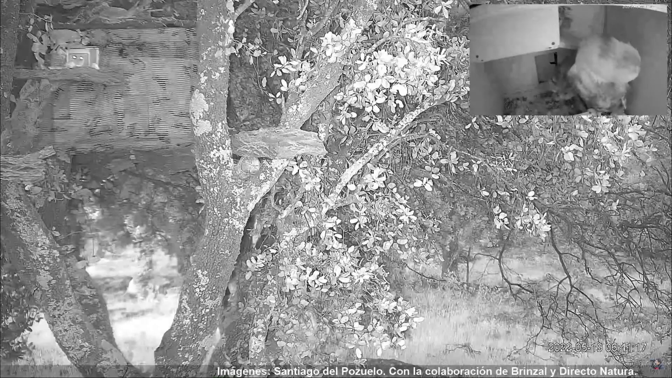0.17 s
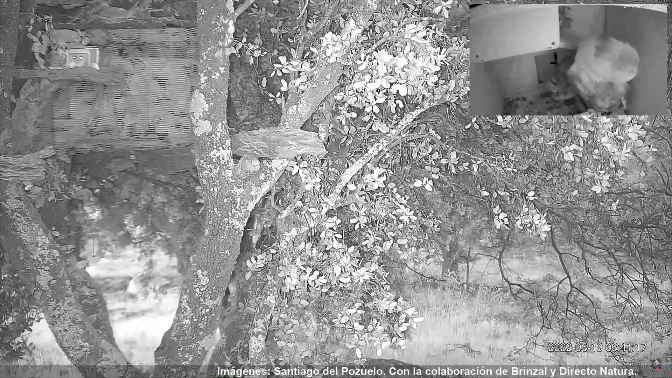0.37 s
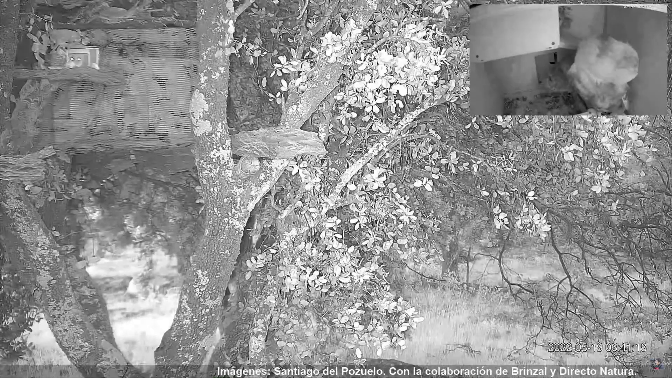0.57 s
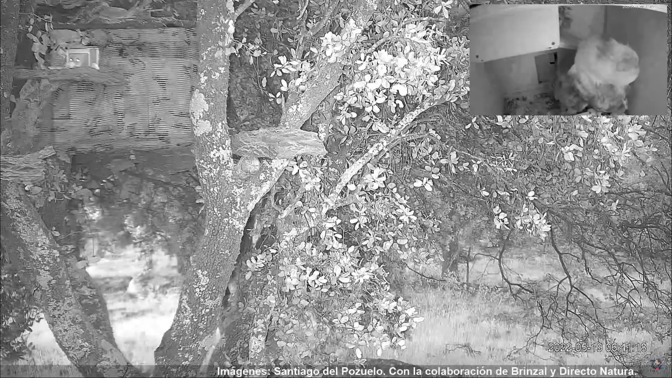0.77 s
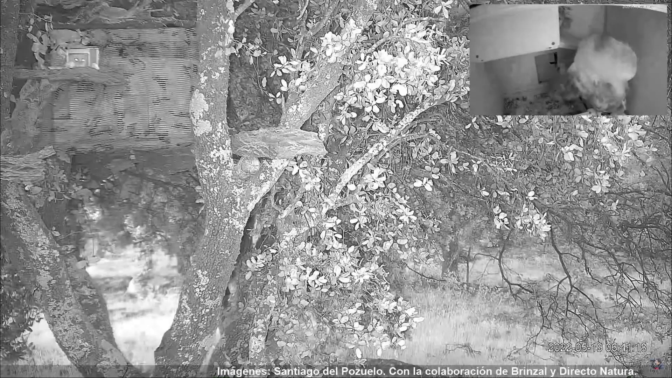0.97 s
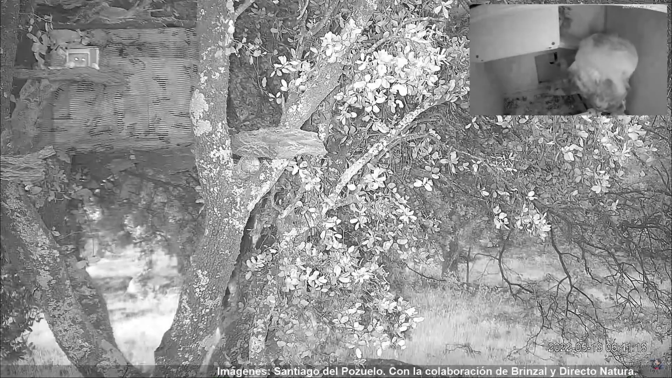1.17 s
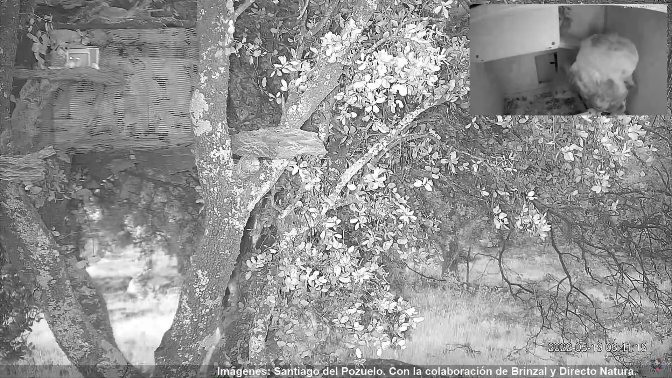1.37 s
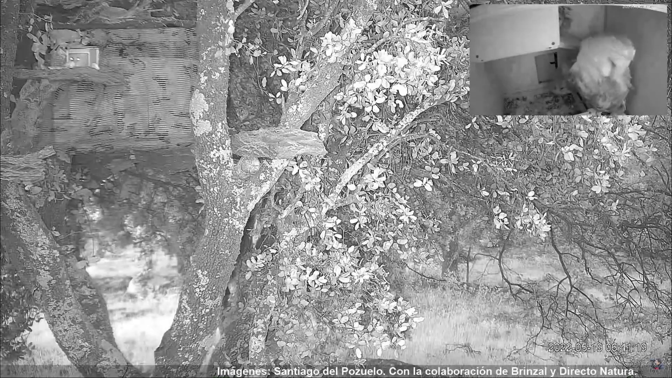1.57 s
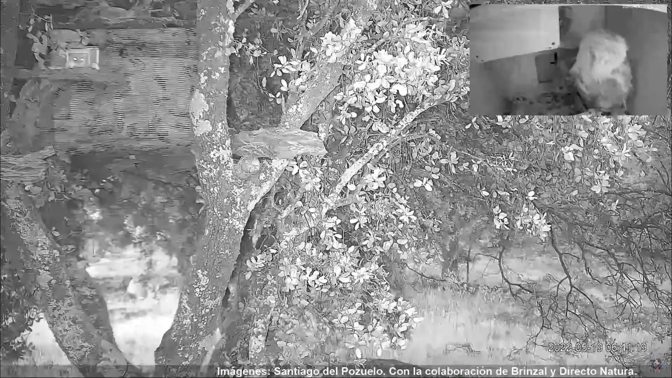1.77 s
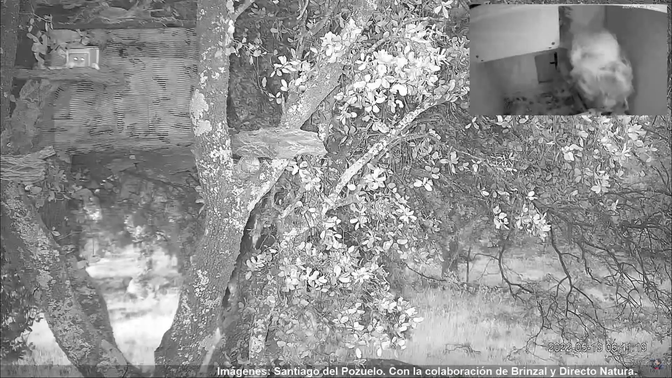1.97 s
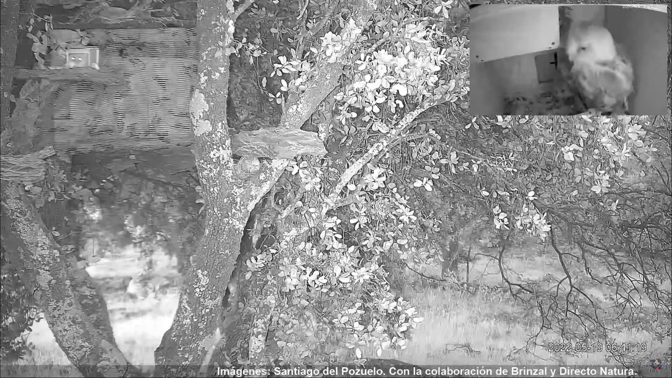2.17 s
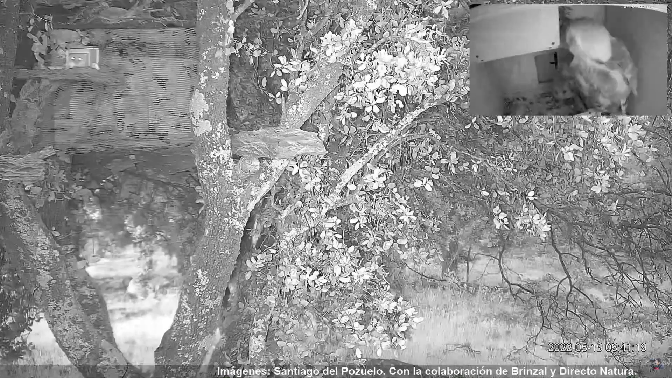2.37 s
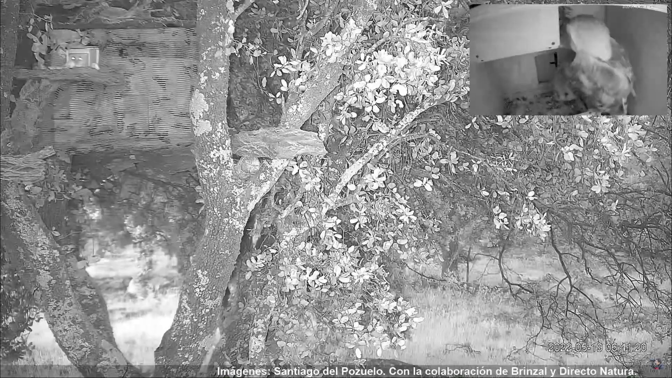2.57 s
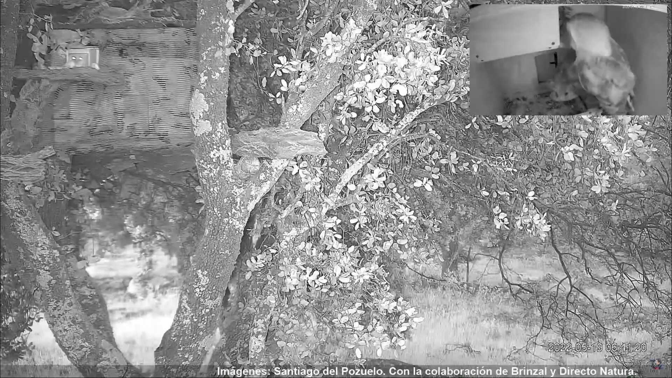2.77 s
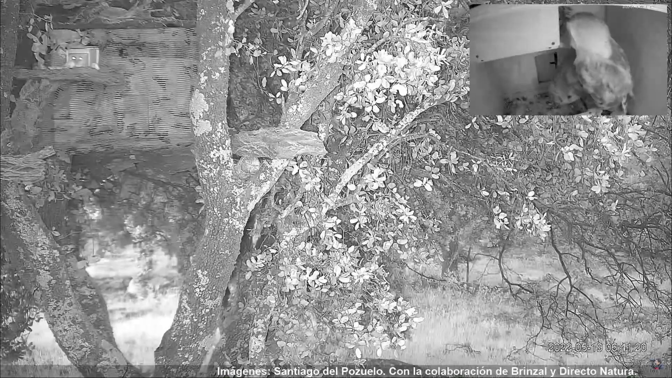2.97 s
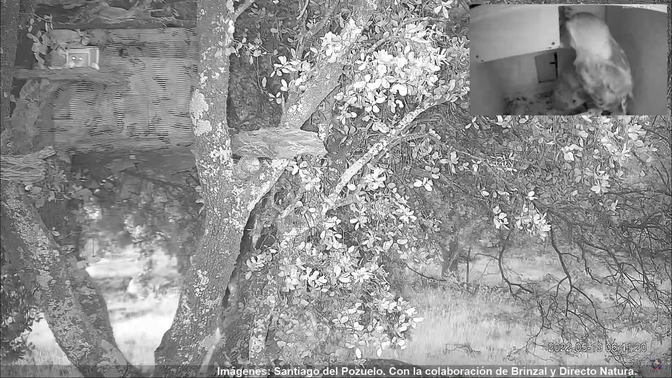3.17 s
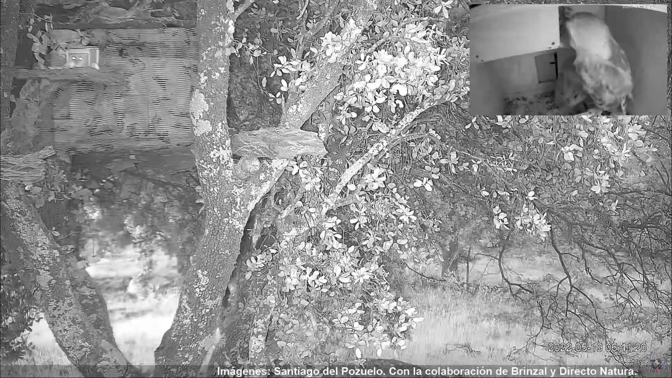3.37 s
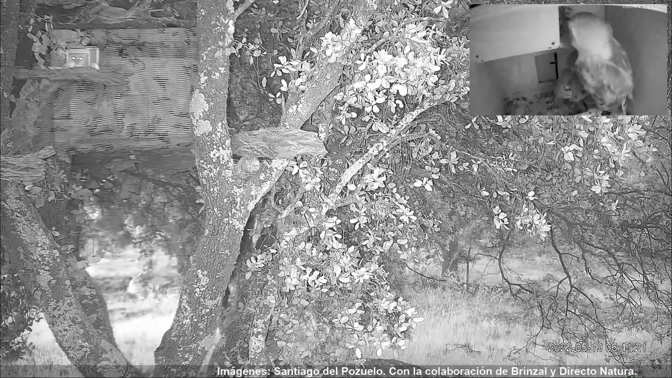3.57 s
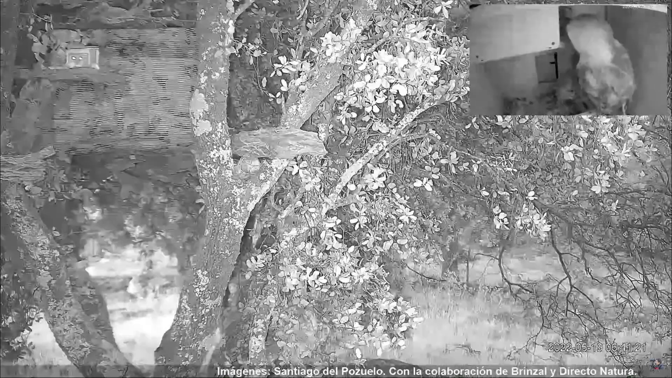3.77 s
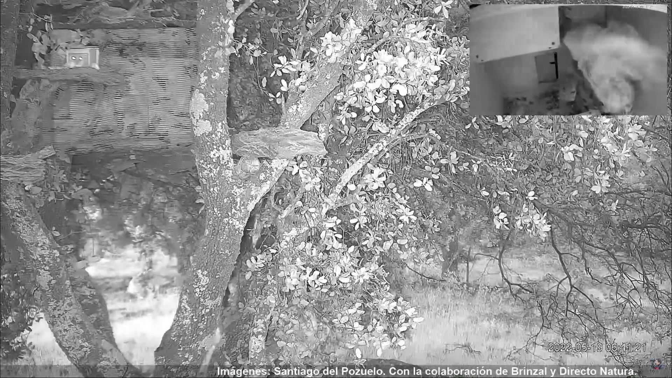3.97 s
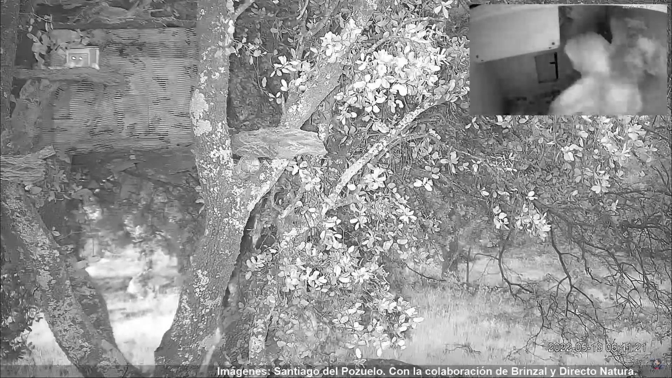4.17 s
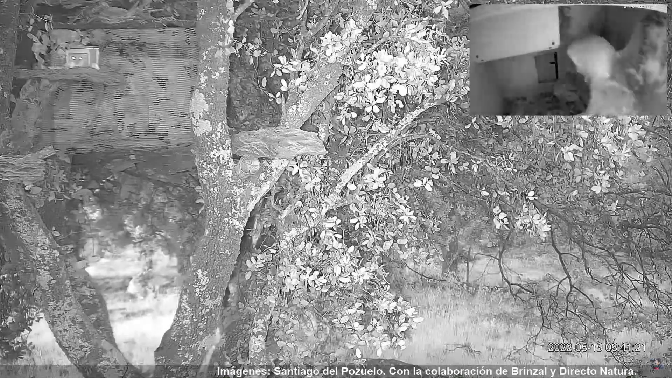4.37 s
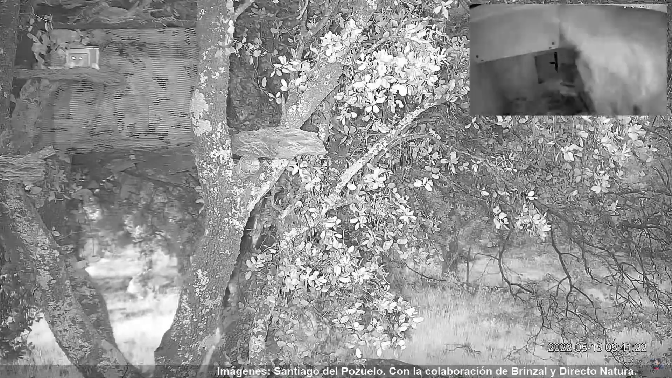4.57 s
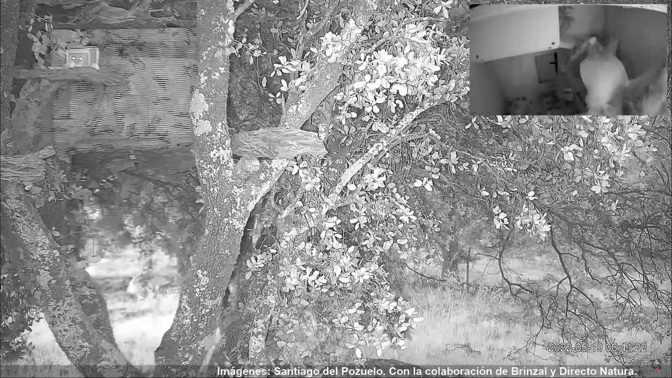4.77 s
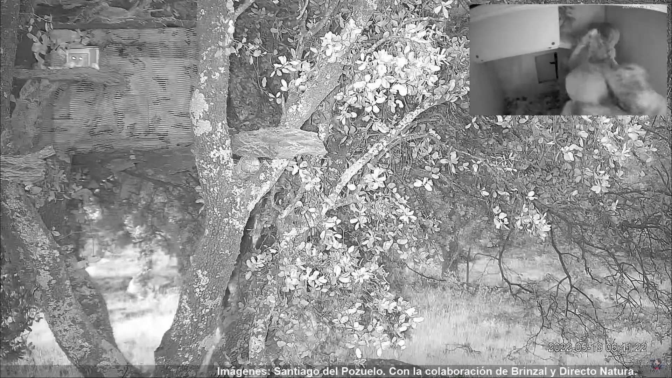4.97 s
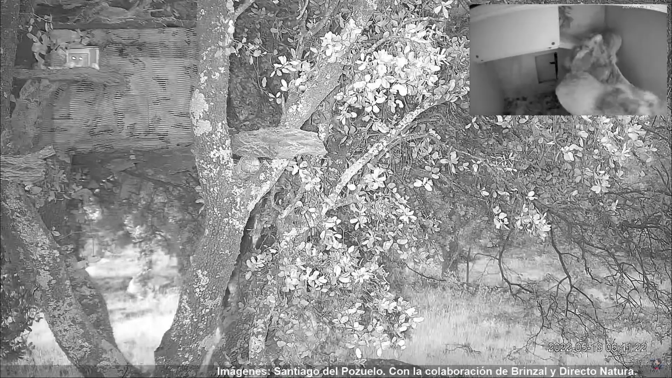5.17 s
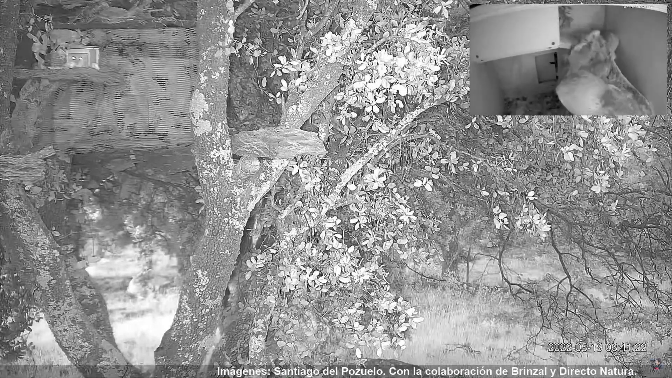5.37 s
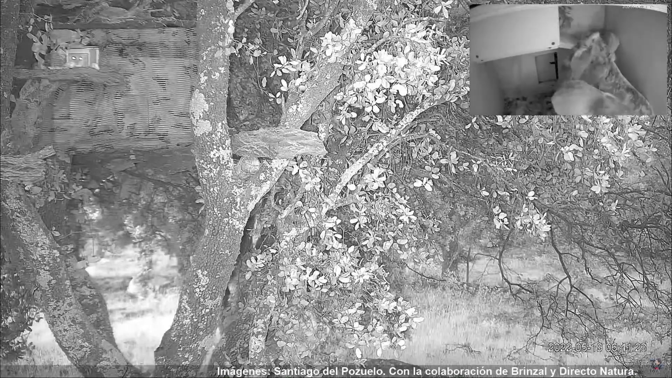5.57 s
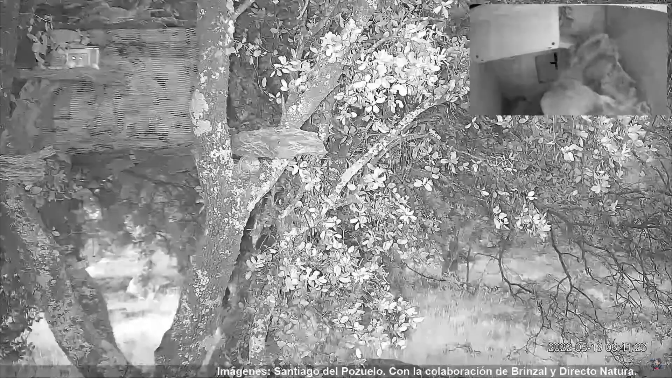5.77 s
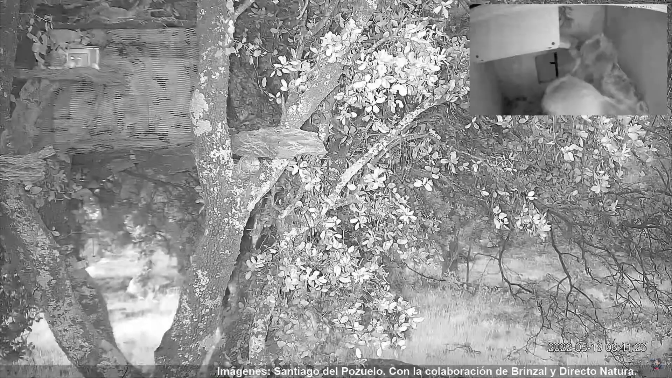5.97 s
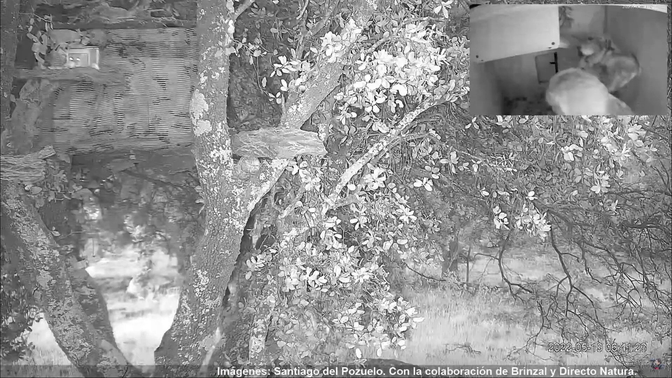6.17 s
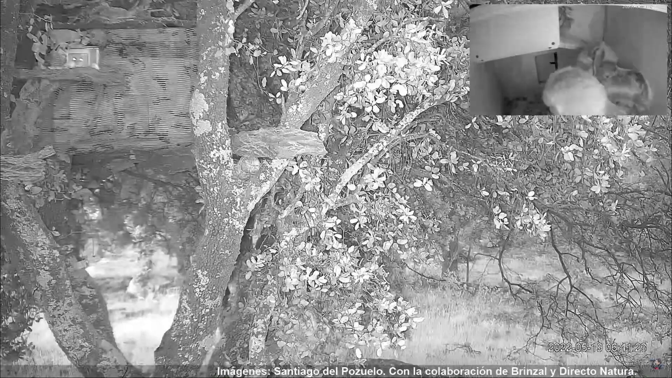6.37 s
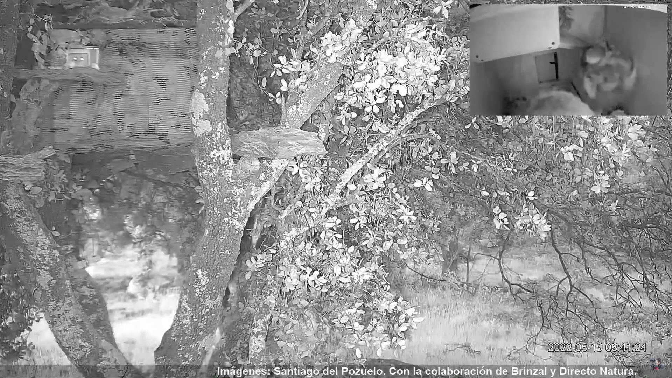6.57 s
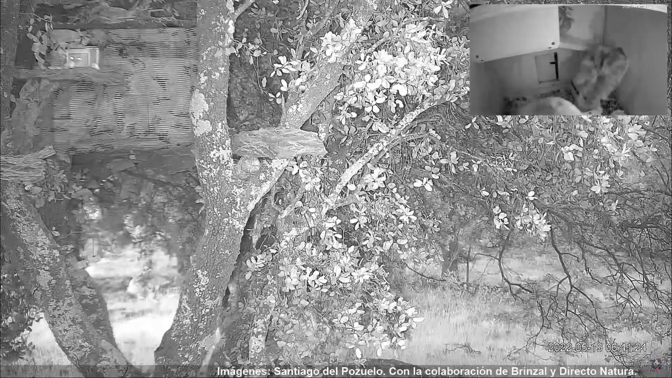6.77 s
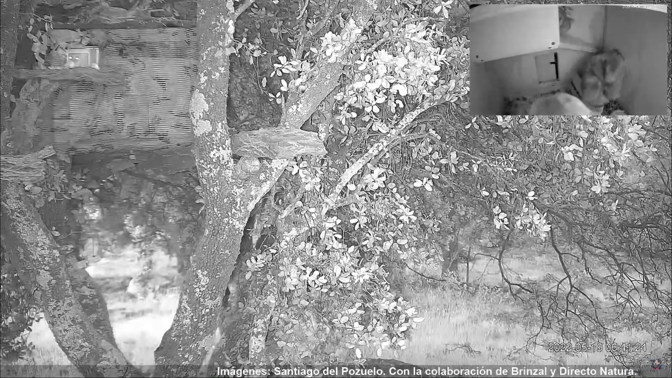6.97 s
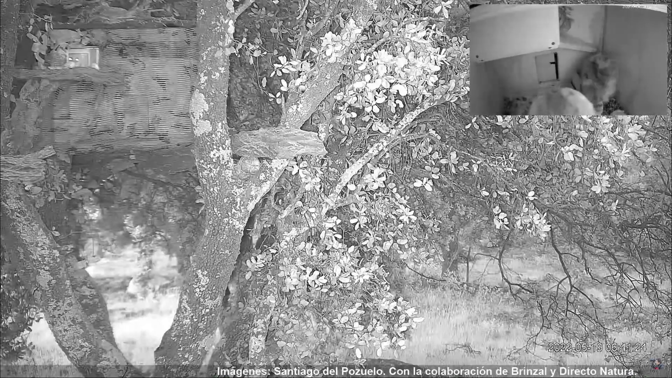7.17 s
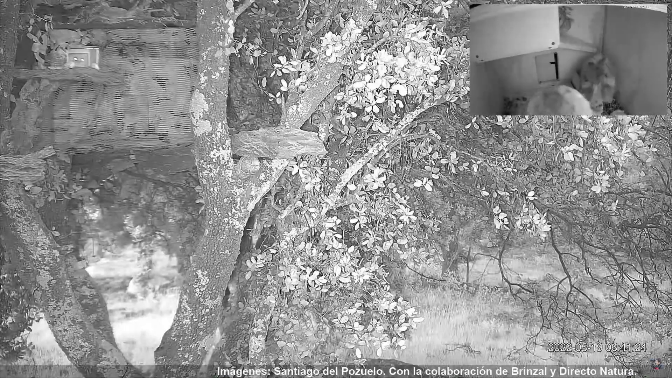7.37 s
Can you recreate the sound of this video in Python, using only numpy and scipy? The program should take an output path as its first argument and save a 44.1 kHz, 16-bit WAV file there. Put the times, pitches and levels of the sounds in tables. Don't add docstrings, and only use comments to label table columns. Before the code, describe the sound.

Close inside a wooden nest box, a young owl shifts its feet: deep panel thuds, small hollow taps, dry claw ticks and rustling litter. A songbird's trill fades outside, then a longer warbling trill and sparse chirps come through the wall. Around four seconds wings batter the boards in a rapid clatter; afterwards come separate heavy stamps and a scratchy skid. Faint hiss and pulsing high whine persist.

```python
import sys
import numpy as np
from scipy import signal
from scipy.fft import rfft, irfft, next_fast_len
from scipy.io import wavfile
from scipy.ndimage import uniform_filter1d, minimum_filter1d, map_coordinates

SR = 44100
rng = np.random.default_rng(int(sys.argv[2]) if len(sys.argv) > 2 else 0)


def decibels_to_gain(level_db):
    exponent = np.asarray(level_db, float) / 20
    return 10 ** exponent


def bounce(signal):
    frames = np.transpose(np.atleast_2d(signal))
    limited = np.clip(frames, -1, 1)
    pcm = np.round(limited * 32767).astype(np.int16)
    wavfile.write(sys.argv[1], SR, pcm)


N = 327663

# frequency in Hz, level in dB, decay time T60 in seconds.
BOARD_MODES = [(360, -2, .07), (500, 0, .07), (665, -8, .06)]
# frequency in Hz, bandwidth in Hz, level in dB.
CAVITY_MODES = [(964, 147, -0.5), (1280, 370, -3.5), (1400, 75, -1.5), (1550, 140, -2.5), (1930, 290, -4.5)]
# frequency in Hz, bandwidth in Hz, level in dB.
UPPER_MODES = [(2230, 430, 4.5), (2854, 294, 9.5), (2980, 347, 7.5), (3665, 110, 3), (4180, 290, 1)]
# frequency in Hz, level in dB.
BRIGHT_EDGE = [(4500, -120), (5000, 0), (8000, -2), (11000, -7), (15500, -13)]


def unit(x):
    return x / np.sqrt(np.mean(x ** 2) + 1e-20)


def along(points, hz, axis=1):
    p = np.array(points)
    return np.interp(np.log(hz + 1), np.log(p[:, 0] + 1), p[:, axis])


def wobble(rate):
    knots = rng.standard_normal(int(N * rate / SR) + 4)
    return map_coordinates(knots, [np.arange(N) * rate / SR])


def filtered(x, response):
    m = next_fast_len(N + SR // 2)
    return irfft(rfft(x, m) * response(np.fft.rfftfreq(m, 1 / SR)), m)[..., :N]


def resonant(x, modes):
    def ring(f):
        total = 0
        for k, (centre, width, db) in enumerate(modes):
            total = total + (-1) ** k * decibels_to_gain(db) * 1j * f * width / (centre * centre - f * f + 1j * f * width)
        return total

    return filtered(x, ring) / np.sqrt(np.mean(abs(ring(np.arange(SR / 2))) ** 2))


def narrow_band(hz, width):
    once = resonant(rng.standard_normal(N), [(hz, width, 0)])
    return unit(resonant(once, [(hz, width, 0)]))


def noise(spectrum):
    return unit(filtered(rng.standard_normal(N), lambda hz: decibels_to_gain(along(spectrum, hz))))


def patchy(x, depth_db):
    z = signal.stft(x, nperseg=256)[2]
    field = uniform_filter1d(rng.standard_normal(z.shape[-2:]), size=4, axis=0)
    field = uniform_filter1d(field, size=5, axis=1)
    return signal.istft(z * decibels_to_gain(depth_db * unit(field)), nperseg=256)[1][..., :N]


def muffled(x):
    return filtered(x, lambda hz: 1 / (1 + 1j * hz / 9000 - (hz / 4700) ** 2 + .45j * hz / 4700) ** 2)


def add(track, s, x):
    part = track[max(round(s * SR), 0):][:len(x)]
    part += x[:len(part)]


def hiss():
    # frequency in Hz, level in dB per Hz.
    air_spectrum = [(410, -32.5), (700, 1), (799, -14.5), (1590, -6), (2360, -15.5), (2840, -11),
                    (3420, -15), (4390, -17), (5010, -21.5), (6110, -23), (14000, -23), (15600, -23.5),
                    (16500, -47)]
    return decibels_to_gain(-71.5) * unit(patchy(noise(air_spectrum), 2.7))


def whine():
    # first burst in seconds, frequency in Hz, bandwidth in Hz, level in dB.
    leak = (-3.5, 4391.5, 379.5, -74.5)
    first, hz, width, db = leak
    away = ((np.arange(N) / SR - first) * 25 + .5) % 1 - .5
    gate = .45 + np.exp(-(away / .08) ** 2) * decibels_to_gain(2.5 * wobble(20))
    return decibels_to_gain(db) * gate * narrow_band(hz, width)


def whistle(s, hz, db, flutter_db):
    t = np.arange(s[0], s[-1], 1 / SR)
    step = np.interp(t, s, np.arange(len(s)))
    eased = np.floor(step) + (1 - np.cos(np.pi * (step % 1))) / 2
    pitch, level = (np.interp(eased, np.arange(len(s)), v) for v in (hz, db))
    phase = 2 * np.pi * np.cumsum(pitch * (1 + 0.018 * wobble(150)[:len(t)])) / SR
    tone = np.sin(phase) + .03 * np.sin(2 * phase)
    return decibels_to_gain(level + flutter_db * wobble(160)[:len(t)]) * np.sqrt(2) * tone


def trill(ratio, high_db, trough_db, high_until, warbles):
    s, hz, db, crest_hz, crest_db = np.transpose(warbles)
    crest_s = s + np.append(.48 * np.diff(s), .012)
    pairs = [s, crest_s], [hz, crest_hz], [db, crest_db]
    s, hz, db = (np.ravel(pair, order="F") for pair in pairs)
    high_db = high_db + np.resize([trough_db, 0], len(s)) + 2 * rng.standard_normal(len(s))
    high_db = high_db - 20 * (s > high_until)
    both = whistle(s, hz, db - 3.5, 4) + whistle(s, ratio * hz, high_db, 3.5)
    return s[0], both[max(round(-s[0] * SR), 0):]


def songbirds():
    # pitch ratio, level in dB, loss in the troughs in dB, stop in seconds.
    upper_voices = [(1.33, -74, 0, .1), (1.26, -76, -8, 1.81)]
    # trough time in seconds, trough frequency in Hz, trough level in dB,
    # next crest frequency in Hz, crest level in dB.
    courses = [
        [(-.028, 4000, -64, 5400, -68), (.022, 3950, -63, 5200, -67), (.077, 3880, -66, 4750, -66),
         (.103, 4600, -84, 4350, -63)],
        [(1.3, 4700, -92, 5300, -92), (1.345, 4800, -92, 5100, -92), (1.405, 4400, -59, 5250, -96),
         (1.456, 4650, -66, 5250, -96), (1.513, 4400, -60, 5250, -96), (1.559, 4200, -60, 5050, -90),
         (1.613, 4150, -60, 5400, -92), (1.664, 4030, -62, 5200, -88), (1.712, 4080, -63, 5600, -88),
         (1.764, 4250, -59, 5650, -92), (1.814, 4520, -57, 6300, -68), (1.862, 4350, -56, 5350, -63),
         (1.915, 3600, -64, 5050, -61), (1.963, 3560, -63, 4800, -59), (2.008, 3560, -68, 4080, -58),
         (2.04, 3650, -68, 3600, -99)],
    ]
    # start in seconds, length in seconds, first and last frequency in Hz, level in dB.
    chirps = [(1.294, 0.04, 3600, 4920, -68.5), (1.61, .035, 6900, 7600, -71),
              (1.849, 0.014, 8400, 7600, -66), (1.86, 0.021, 5700, 6600, -64),
              (1.866, .018, 7000, 8500, -64), (1.894, .016, 8500, 7000, -68),
              (2.62, 0.039, 4630, 4400, -75.5), (2.837, 0.03, 4040, 4500, -66.5),
              (2.947, 0.026, 3180, 3750, -66), (3.235, 0.026, 4030, 4300, -66.5),
              (3.286, 0.027, 3160, 3650, -70), (3.563, .03, 3500, 3170, -73),
              (3.758, 0.058, 5270, 5030, -70), (7.198, 0.052, 4520, 4420, -69)]
    # frequency in Hz, bandwidth in Hz, level in dB.
    rasp = (7200, 1300, -77)
    rasp_span = (1.61, 2.01)
    out = np.zeros(N)
    for voice, course in zip(upper_voices, courses):
        add(out, *trill(*voice, course))
    for s, length, from_hz, to_hz, db in chirps:
        note = whistle([0, length], [from_hz, to_hz], [db, db], 1.7)
        add(out, s, note * np.hanning(len(note)))

    (s, end), (hz, width, db) = rasp_span, rasp
    size = round((end - s) * SR)
    pulses = np.sin(np.pi * 88 * np.arange(N) / SR + .5 * wobble(30)) ** 4
    buzz = narrow_band(hz, width) * decibels_to_gain(3 * wobble(60)) * 1.6 * pulses
    add(out, s, decibels_to_gain(db) * buzz[:size] * signal.windows.tukey(size, .2))

    def wall_response(hz):
        peak = .9 * np.exp(-((hz - 4450) / 170) ** 2)
        dip = .55 * np.exp(-((hz - 5600) / 400) ** 2)
        return .75 + peak - dip

    through = filtered(out, wall_response)
    t = np.arange(SR // 4) / SR
    echoes = rng.standard_normal(len(t)) * (decibels_to_gain(-60 * t / .022) + .07 * decibels_to_gain(-60 * t / .2))
    echoes = echoes / np.linalg.norm(echoes)
    return through + decibels_to_gain(-4) * signal.fftconvolve(through, echoes)[:N]


def shuffle():
    # time in seconds, level of weight shifting in dB.
    restlessness = [(0.0, -42.5), (0.93, -45.5), (1.9, -42.5), (2.21, -47), (3.1, -42), (3.37, -45.5),
                    (3.99, -35.5), (4.3, -34.5), (4.61, -26), (4.78, -36.5), (5.05, -42.5), (5.48, -36.5),
                    (5.75, -41), (6.15, -39.5), (6.308, -31), (6.43, -40.5), (7.01, -42.5), (7.43, -39.5)]
    # frequency in Hz, level in dB per Hz.
    weight_spectrum = [(12, -46.5), (20, -13.5), (32, -11), (54, -1.5), (70, -1), (91, -4.5), (161, -9),
                       (206, -13.5), (320, -21), (420, -64), (700, -120)]
    # frequency in Hz, level in dB per Hz.
    litter_spectrum = [(150, -28), (260, 0), (392, -2.5), (506, -2), (683, -11), (807, -22), (900, -17),
                       (1170, -58.5), (1980, -120)]
    weight_db = np.interp(np.arange(N) / SR, *np.transpose(restlessness))
    litter_db = -62 + 0.7 * (weight_db + 43)
    clumps = wobble(25)
    weight = unit(noise(weight_spectrum) * decibels_to_gain(0.75 * wobble(11)))
    litter = unit(noise(litter_spectrum) * decibels_to_gain(3.2 * clumps + 2.5 * wobble(6)))
    grains = patchy(rng.standard_normal((2, N)) * decibels_to_gain(3.1 * clumps + 4.6 * wobble(210)), 1.4)
    stir = unit(resonant(grains[0], CAVITY_MODES))
    stir = stir + decibels_to_gain(-6.0) * unit(muffled(resonant(grains[1], UPPER_MODES)))
    return decibels_to_gain(weight_db) * weight + decibels_to_gain(litter_db) * (litter + decibels_to_gain(-12.0) * stir)


def scuffs():
    # start in seconds, length in seconds, level in dB, brightness in dB, hollowness in dB.
    drags = [(0.232, 0.089, -70.5, -13, 20.5), (1.338, 0.035, -59, -36, 6.5), (2.04, 0.13, -72, -20, 13),
             (3.02, 0.17, -64, -10.5, 13), (3.869, 0.071, -57, -11, 15), (3.937, 0.058, -60, 5, -14),
             (3.998, 0.064, -53, -14, -1), (4.147, 0.11, -57, -2.5, -25), (4.267, 0.024, -46.5, -13, 9),
             (4.323, 0.07, -61, -4.5, -5), (4.386, 0.06, -50, -9.5, 7.5), (4.478, 0.038, -50.5, -10, 11),
             (4.512, 0.025, -50, -8, 9.5), (4.586, 0.029, -53, 8.5, 8), (4.657, 0.1, -49.5, 1.5, -4),
             (4.705, 0.065, -56, -0.5, 11), (4.752, 0.039, -62.5, 5.5, 0.5), (5.003, 0.13, -62, -18, 9),
             (5.289, 0.086, -62, -33.5, 12), (6.282, 0.065, -55.5, 0, 1), (6.706, 0.041, -49.5, -6.5, 13.5),
             (6.727, 0.033, -46, -4, 0), (6.763, 0.1, -56.5, -0.5, 17.5), (7.1, 0.18, -69, -4, 10.5)]
    size = np.zeros((3, N))
    for s, length, db, bright_db, hollow_db in drags:
        swell = np.hanning(round(length * SR)) ** .5
        for track, extra_db in zip(size, (0, bright_db, hollow_db)):
            add(track, s, decibels_to_gain(db + extra_db) * swell)
    grit = patchy(rng.standard_normal((3, N)) * decibels_to_gain(1.2 * wobble(90) + 3.5 * wobble(400)), 3.4)
    cavity = unit(resonant(grit[0], CAVITY_MODES))
    upper = unit(muffled(resonant(grit[1], UPPER_MODES)))
    edge = unit(filtered(grit[1], lambda hz: decibels_to_gain(along(BRIGHT_EDGE, hz))))
    upper += np.minimum(20 * size[1], .04) * edge
    hollow = unit(resonant(grit[2], [(f, 90, g) for f, g, _ in BOARD_MODES]))
    return size[0] * cavity + size[1] * upper + size[2] * hollow


def snaps():
    # time in seconds, peak level in dB.
    cracks = [(3.9393, -43.5), (4.15, -57.5), (4.2538, -40.5), (4.5444, -38.5), (4.5742, -53),
              (4.5884, -57.5), (5.017, -55.5), (6.1526, -55.5), (6.7334, -55.5), (6.777, -51.5),
              (6.806, -51.5)]
    out, t = np.zeros(N), np.arange(SR // 10) / SR
    decay = decibels_to_gain(-60 * t / 0.023) + 0.25 * decibels_to_gain(-60 * t / 0.045)
    for s, db in cracks:
        add(out, s, decibels_to_gain(db - 0.5) * decay * rng.standard_normal(len(t)))
    return filtered(out, lambda hz: decibels_to_gain(along(BRIGHT_EDGE, hz)))


def pings():
    # time in seconds, peak level in dB, frequency in Hz.
    strikes = [(.609, -30.5, 1045), (.69, -41.5, 1194), (1.841, -45, 2770), (4.69, -42.5, 1900),
               (5.328, -35.5, 1047), (5.33, -36, 1993), (5.415, -43, 1800), (5.455, -49.5, 1400)]
    out, t = np.zeros(N), np.arange(SR // 10) / SR
    for s, db, hz in strikes:
        envelope = decibels_to_gain(db - 60 * t / .035) * (1 - np.exp(-t / 0.00079))
        add(out, s, envelope * np.sin(2 * np.pi * hz * t))
    return out


def taps():
    # time in seconds, peak level in dB, pitch in Hz.
    side_walls = [(0.103, -39.5, 228), (0.607, -15.5, 225), (0.688, -35, 280.4), (1.002, -44, 241),
                  (1.35, -36, 240), (1.438, -34, 257), (1.599, -42.5, 272), (1.733, -38.5, 256),
                  (2.461, -26.5, 220.4), (3.884, -47.5, 224), (3.935, -33.5, 225), (3.977, -43.5, 228),
                  (4.071, -37, 235), (4.127, -32.5, 264), (4.257, -26.5, 234), (4.347, -50.5, 222),
                  (4.384, -24.5, 235), (4.407, -23.5, 276.6), (4.473, -34.5, 225), (4.539, -15.5, 231.3),
                  (4.588, -22.5, 232.3), (4.731, -19, 240), (4.773, -29, 289), (5.003, -34.5, 273),
                  (5.218, -34, 223), (5.359, -43.5, 272), (5.413, -25, 224), (5.468, -42, 225),
                  (5.539, -50, 287), (5.597, -47, 250), (5.911, -50, 227), (6.103, -35.5, 229),
                  (6.149, -19.5, 295.7), (6.189, -24.5, 239.5), (6.29, -42, 252), (6.399, -54, 233),
                  (6.606, -27.5, 247), (6.717, -46.5, 225), (6.736, -33, 225), (6.779, -14, 245.2),
                  (6.995, -47.5, 231), (7.391, -34.5, 221)]
    # time in seconds, peak level in dB, pitch in Hz.
    toe_taps = [(0.279, -42.5, 550), (0.56, -46, 518), (0.61, -12, 479), (0.722, -42.5, 490),
                (1.001, -45, 443), (1.344, -36, 493), (1.372, -29, 669), (1.42, -46, 452),
                (1.444, -45, 503), (1.602, -50, 432), (1.703, -52, 439), (1.841, -32.5, 540),
                (1.927, -51, 500), (1.969, -45.5, 433), (2.013, -52, 447), (2.094, -45.5, 490),
                (2.132, -48, 563), (2.164, -48, 514), (2.643, -53.5, 480), (2.745, -47.5, 526),
                (2.767, -45, 556), (2.82, -45, 507), (2.852, -51, 507), (2.894, -43.5, 466),
                (2.957, -46.5, 353), (3.051, -39, 514), (3.088, -46, 440), (3.107, -58, 447),
                (3.135, -57, 500), (3.159, -42, 436), (3.196, -42, 506), (3.237, -51, 487),
                (3.382, -45.5, 502), (3.492, -46.5, 490), (3.555, -45.5, 427), (4.272, -31, 492),
                (4.395, -36, 420), (4.518, -38.5, 362), (4.61, -34.5, 355), (4.971, -35, 501),
                (5.304, -47.5, 355), (5.327, -29, 483), (5.683, -59, 458), (5.78, -42.5, 453),
                (6.001, -42, 510), (6.077, -48.5, 538), (6.149, -27, 359), (6.261, -48, 430),
                (6.29, -35, 518), (6.318, -32.5, 540), (6.448, -44, 507), (6.497, -45.5, 448),
                (6.585, -52, 482), (6.639, -40, 484), (6.698, -33.5, 530), (6.719, -32, 351),
                (6.835, -43.5, 488), (6.938, -50, 371)]
    out, t = np.zeros(N), np.arange(SR // 5) / SR
    for rows, t60, rise in ((side_walls, 0.12, .002), (toe_taps, 0.05, .001)):
        for s, db, hz in rows:
            luck = rng.standard_normal(2)
            own = np.sin(2 * np.pi * hz * t)
            neighbour = np.sin(2 * np.pi * hz * (1.25 + 0.11 * luck[1]) * t)
            pair = own + decibels_to_gain(-8.5 + 1.5 * luck[0]) * neighbour
            add(out, s, decibels_to_gain(db + 1.5 - 60 * t / t60) * (1 - np.exp(-t / rise)) ** 2 * pair)
    return out


def claws():
    # time in seconds, peak level in dB, brightness in dB.
    walking_ticks = [(0.535, -43.5, -26), (0.562, -42.5, -20), (0.609, -35.5, -14), (0.645, -38, -12.5),
                     (0.673, -35.5, -9), (0.69, -36, -12), (1.369, -17, -20), (1.794, -46, -22),
                     (1.842, -22, -15), (1.911, -44, -15), (2.415, -39, -23), (2.425, -30, -14.5),
                     (2.461, -35.5, -25), (2.817, -49, -4), (3.085, -39, -14), (3.115, -35.5, -16),
                     (3.159, -42.5, -13), (5.329, -30, -7), (6.101, -42, -23), (6.108, -27.5, -9.5),
                     (6.153, -29, -14), (6.408, -41, -7.5), (6.607, -42.5, -11), (6.64, -34, -11)]
    # time in seconds, peak level in dB, brightness in dB.
    quill_raps = [(3.729, -40, -9), (3.763, -42.5, -15), (3.842, -49, -14), (3.877, -35, -6.5),
                  (3.906, -33.5, -16), (3.94, -37, 11), (4.003, -37.5, -18), (4.033, -40, -5),
                  (4.07, -29, -4.5), (4.151, -36.5, -7), (4.198, -48, -19), (4.254, -27, 7.5),
                  (4.272, -42, 3), (4.29, -34, -21), (4.343, -45, -2), (4.396, -31.5, -9),
                  (4.489, -35.5, -10.5), (4.594, -44, 4), (4.545, -19, -4), (4.574, -41, 7),
                  (4.931, -40.5, -31), (4.97, -33.5, -5.5), (4.988, -31.5, -9), (5.016, -20.5, -7)]
    # time in seconds, peak level in dB, brightness in dB.
    skids = [(1.251, -51.5, -2), (1.421, -45, -6), (1.96, -46, -11.5), (4.123, -36.5, -5), (4.384, -40, -2),
             (4.479, -33, -40), (4.655, -39.5, -1), (6.289, -50.5, -17.5), (6.696, -37.5, -6.5)]
    # time in seconds, peak level in dB, brightness in dB.
    stutters = [(4.682, -46, -10), (4.722, -42.5, -4), (6.719, -43, 0), (6.777, -17.5, -2.5),
                (6.796, -22.5, -8.5), (6.808, -26.5, -7.5), (6.818, -40, -2), (6.845, -52, 2)]
    drive, rung, t = np.zeros((2, N)), np.zeros(N), np.arange(SR // 4) / SR
    for rows, t60 in ((walking_ticks, .042), (quill_raps, .05), (skids, .16), (stutters, .042)):
        tail = decibels_to_gain(-60 * t / t60) * (1 - np.exp(-t / 0.0015))
        for s, db, bright_db in rows:
            luck, grit = rng.standard_normal((2, 12)), rng.standard_normal((2, len(t)))
            add(drive[0], s, decibels_to_gain(db - 14.5) * tail * grit[0])
            add(drive[1], s, decibels_to_gain(db + bright_db - 16) * tail * grit[1])
            modes = list(CAVITY_MODES) + [(f, w, g + bright_db - 3.0) for f, w, g in UPPER_MODES]
            tick = np.zeros(len(t))
            for k, (f, width, g) in enumerate(modes):
                decay = decibels_to_gain(g + 2.8 * luck[0, k]) * np.exp(-1.5 * np.pi * width * t)
                tick += decay * np.sin(2 * np.pi * f * (1 + .05 * luck[1, k]) * t)
            add(rung, s, decibels_to_gain(db - 9) * tick * (1 - np.exp(-t / .0005)))
    return muffled(rung + resonant(drive[0], CAVITY_MODES) + resonant(drive[1], UPPER_MODES))


def thumps():
    # time in seconds, peak level in dB, panel pitch in Hz, knock level in dB.
    footfalls = [(0.107, -15, 136, -26), (0.237, -33, 155.4, -14), (0.549, -37, 102, -12),
                 (0.61, -10.5, 158, -15.5), (0.658, -18, 135, -17.5), (1.255, -37.5, 156.5, -9),
                 (1.361, -24.5, 159, -17), (1.398, -25.5, 103, -13.5), (1.728, -23, 128, -29),
                 (1.802, -46, 115, -2), (1.867, -23.5, 165, -16), (2.41, -32.5, 111, -11),
                 (2.465, -10, 162.7, -21), (3.122, -23.5, 155, -50), (5.224, -18, 170, -30),
                 (5.367, -18.5, 169.3, -23), (5.424, -12.5, 154.3, -30), (5.535, -19, 152, -48.5),
                 (5.593, -23.5, 150, -47), (5.894, -30.5, 161, -33), (6.106, -17, 125, -17),
                 (6.148, -5, 121.3, -23.5), (6.199, -19, 145, -39.5), (6.4, -13, 134.7, -32.5),
                 (6.603, -12.5, 108.8, -26), (6.729, -18.5, 143, -21.5), (6.751, -10.5, 147.7, -22.5),
                 (6.78, -9.5, 140.3, -8.5), (7.38, -12, 132, -63.5)]
    # time in seconds, peak level in dB, panel pitch in Hz, knock in dB.
    wing_blows = [(3.747, -31, 154.5, -13), (3.881, -32, 122, -5), (3.934, -13, 174.7, -32.5),
                  (4.094, -19.5, 130.8, -27.5), (4.155, -22.5, 153.4, -16.5), (4.254, -15, 203.8, -21.5),
                  (4.277, -16.5, 113.3, -26), (4.386, -18.5, 106, -39.5), (4.425, -10, 140.5, -31.5),
                  (4.49, -13.5, 113, -31.5), (4.502, -10, 137.4, -31.5), (4.54, -4.5, 111.6, -26.5),
                  (4.59, -9, 137.7, -30.5), (4.653, -18, 106, -32), (4.731, -11, 126, -21.5),
                  (4.932, -34.5, 153, -10.5), (4.998, -17.5, 66.5, -21)]
    # time in seconds, peak level in dB, panel pitch in Hz, knock level in dB.
    foot_shifts = [(0.814, -39.5, 76, -41), (1.44, -30, 134.6, -33), (1.898, -30, 80, -42),
                   (3.165, -32.5, 145, -35), (3.232, -35, 140, -32), (5.046, -31.5, 71.5, -51),
                   (6.254, -21.5, 89.4, -43)]
    # frequency in Hz, level in dB, share of the decay time.
    panel_modes = [(136.7, 0, 0.8), (167.3, 1, 0.86)]
    # frequency in Hz, level in dB, decay time T60 in seconds.
    mount_modes = [(42, -7, 0.3), (68.87, 4, 0.32)]
    grips = [.141, 0.648, 1.742, 2.497, 3.958, 4.295, 4.466, 4.569, 4.616, 5.249, 5.4, 5.47, 6.186, 6.425,
             6.623, 6.805]
    # period in seconds, level in dB, decay time T60 in seconds.
    lurch = (0.03, -7, 0.15)
    out, t = np.zeros(N), np.arange(SR // 2) / SR

    def ring(hz, db, t60, rise):
        decay = decibels_to_gain(db - 60 * t / max(t60, .02))
        return decay * np.sin(2 * np.pi * hz * t) * (1 - np.exp(-t / rise)) ** 2

    blows = [(*r, -12) for r in footfalls] + [(*r, -18) for r in wing_blows + foot_shifts]
    for s, db, hz, knock_db, sway_db in blows:
        sway_db += 0.19 * (knock_db + 21)
        luck = rng.normal(0, 1, 24)
        rise = 0.0022 * decibels_to_gain(-.35 * (knock_db + 17.0))
        grip = min([g - s for g in grips if 0 < g - s < .055], default=None)
        x = -ring(hz, 0, 0.11 if grip is None else 0.28, rise)
        for k, (f, g, share) in enumerate(panel_modes):
            panel = ring(f * (1 + 0.018 * luck[k]), g - 7 + 4.85 * luck[k + 4], 0.19 * share, 1.8 * rise)
            x += panel * np.sign(luck[k + 8])
        if grip:
            x *= decibels_to_gain(np.interp(t, [grip, grip + .004, grip + .2], [-2.5, -11, -44]))
        for k, (f, g, t60) in enumerate(mount_modes):
            x += ring(f * (1 + 0.078 * luck[k + 12]), g + sway_db, t60, 0.003)
        for k, (f, g, t60) in enumerate(BOARD_MODES):
            board_db = g + knock_db - 2.5 + 2.0 * luck[k + 20]
            x -= ring(f * (1 + 0.093 * luck[k + 16]), board_db, t60, 0.22 * rise)
        add(out, s, decibels_to_gain(db + 3.5) * x)
    period, db, t60 = lurch
    add(out, 4.603, -ring(1 / period, db + 6.5, t60, 0.01))
    return out


def scene():
    outside = hiss() + whine() + songbirds()
    owl = shuffle() + scuffs() + snaps() + pings() + taps() + claws() + thumps()
    mono = outside + owl
    return np.array([mono, mono])


def band_limit(x):
    return signal.sosfilt(signal.butter(12, 16620, fs=SR, output="sos"), x)


def record(dry):
    skip = (0.5975, .608)
    # frequency in Hz, right-left level in dB, phase in radians.
    spread = [(220, 0, .15), (330, 1.5, .27), (460, 3.4, .05), (660, 1.4, -.22), (770, -.3, 0),
              (950, 2, .33), (1220, 4.5, 0), (1550, 1, -.4), (2100, -1.6, -.25), (2800, -3, 0),
              (4200, -2.5, 0), (6500, -1, 0), (10000, -.5, .05)]
    need = np.minimum(1, .585 / (abs(dry[0]) + 1e-9))
    held = dry * uniform_filter1d(minimum_filter1d(need, size=257), size=257)
    corners = np.repeat(skip, 2) + [-.002, 0, 0, .0003]
    held = held * np.interp(np.arange(N) / SR, corners, [1, .03, .03, 1])

    def spreading(hz):
        phase = along(spread, hz, axis=2) * np.clip(hz / 220, 0, 1) ** 2
        half = decibels_to_gain(along(spread, hz) / 2) * np.exp(.5j * phase)
        return np.array([1 / half, half]) * (hz < 15800)

    wide = filtered(held, spreading)
    return band_limit(wide)


dry = scene()
out = record(dry)
bounce(out)
```